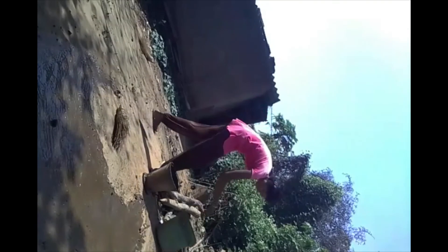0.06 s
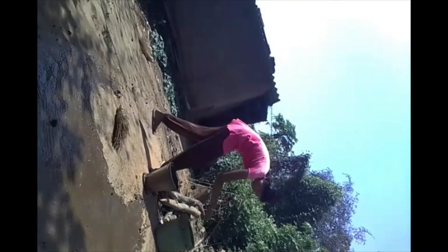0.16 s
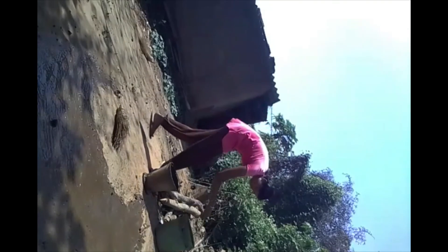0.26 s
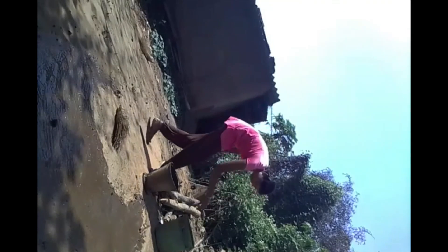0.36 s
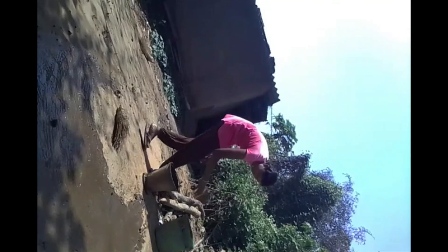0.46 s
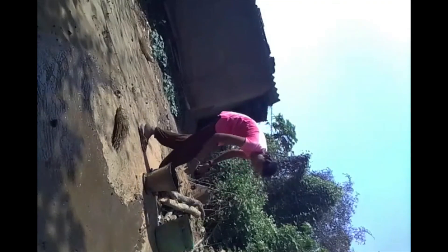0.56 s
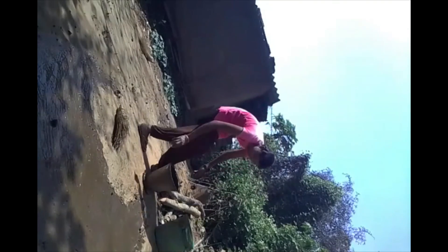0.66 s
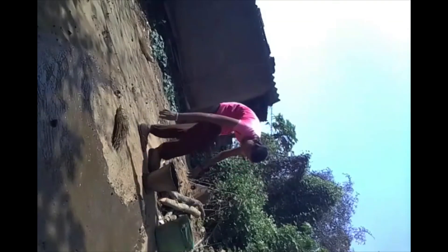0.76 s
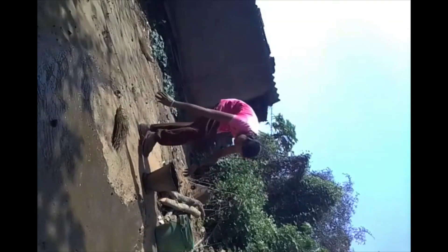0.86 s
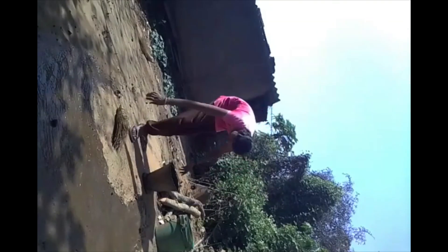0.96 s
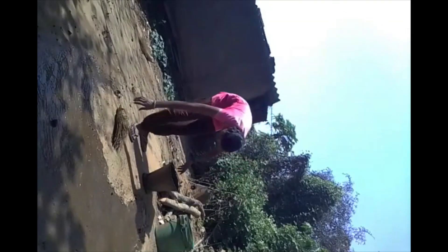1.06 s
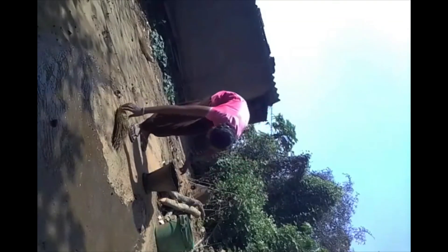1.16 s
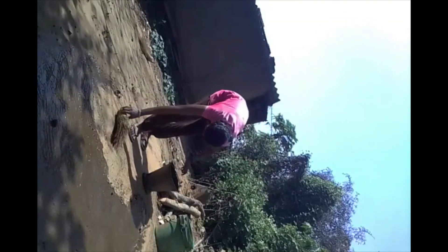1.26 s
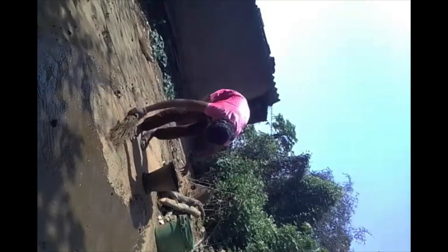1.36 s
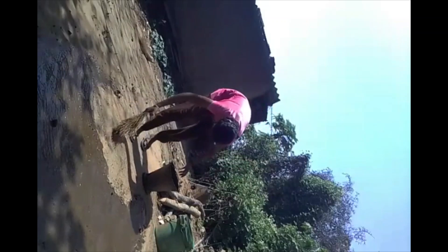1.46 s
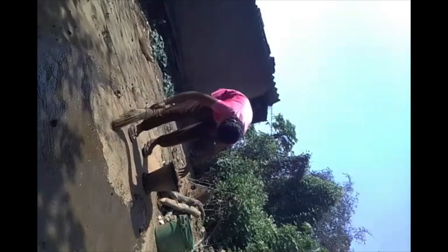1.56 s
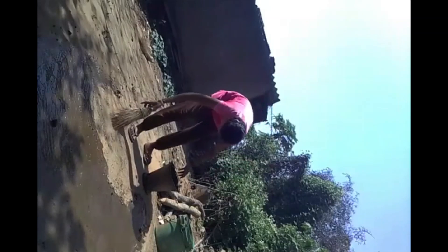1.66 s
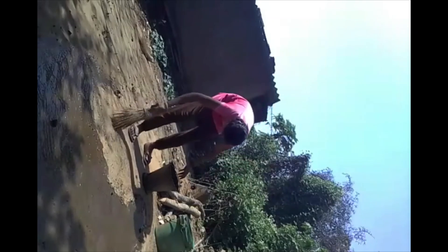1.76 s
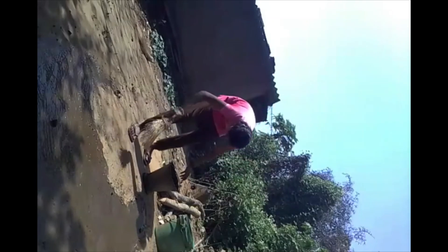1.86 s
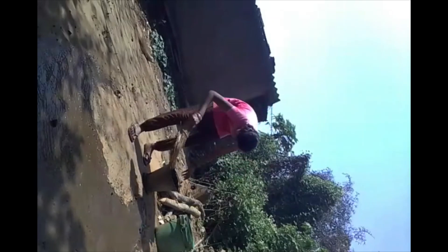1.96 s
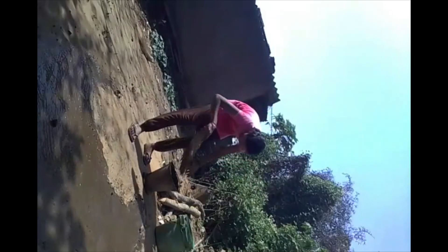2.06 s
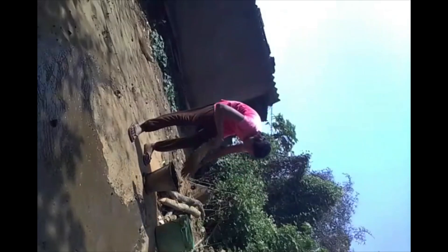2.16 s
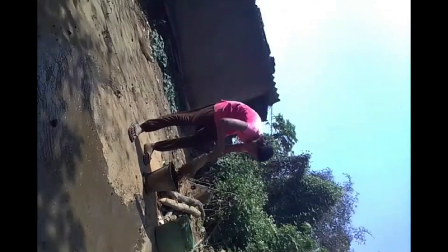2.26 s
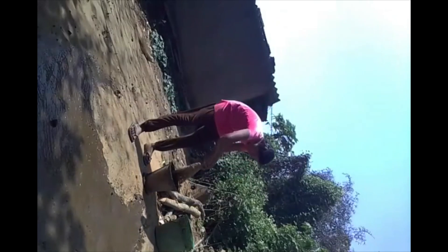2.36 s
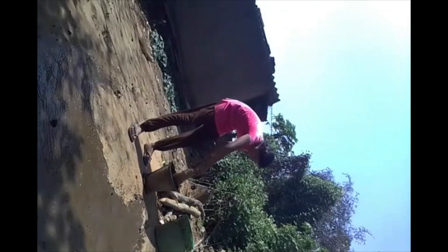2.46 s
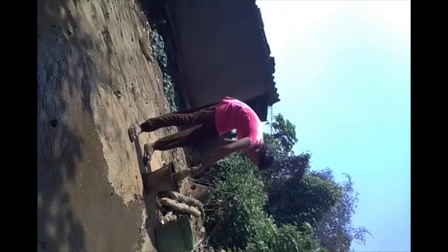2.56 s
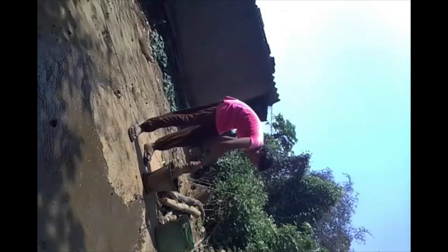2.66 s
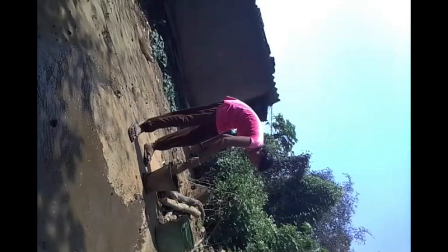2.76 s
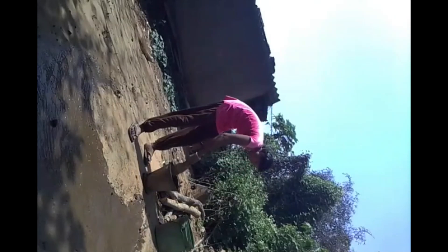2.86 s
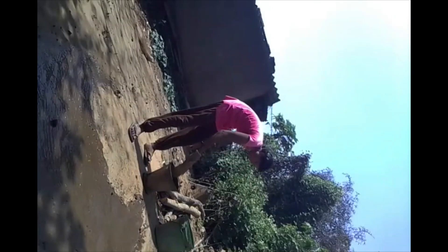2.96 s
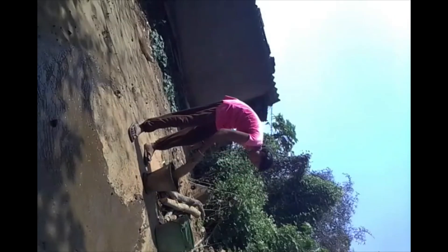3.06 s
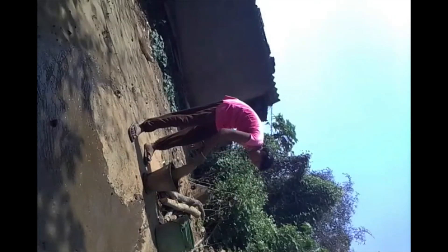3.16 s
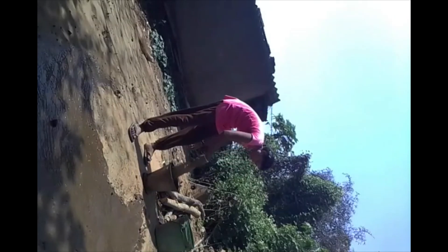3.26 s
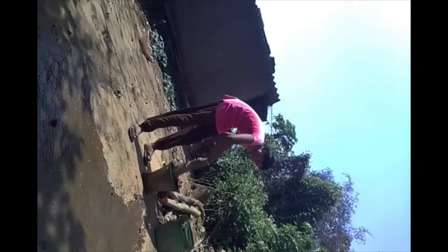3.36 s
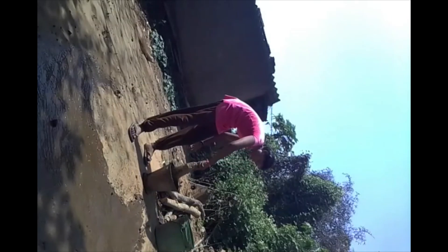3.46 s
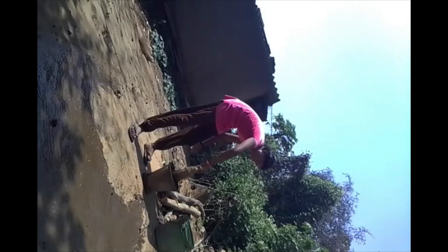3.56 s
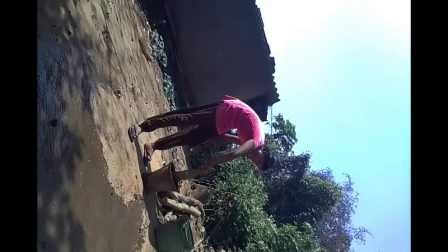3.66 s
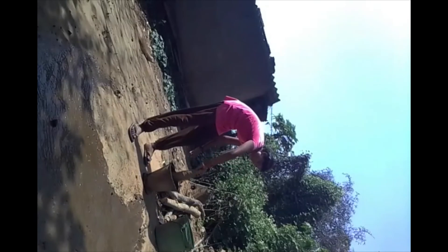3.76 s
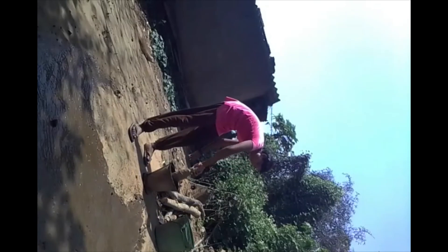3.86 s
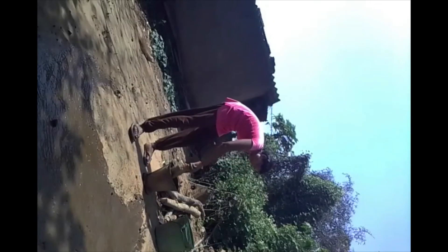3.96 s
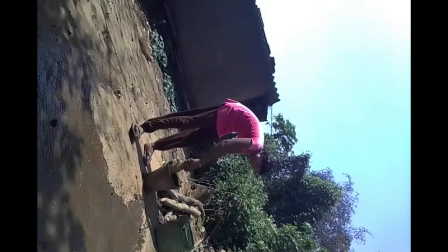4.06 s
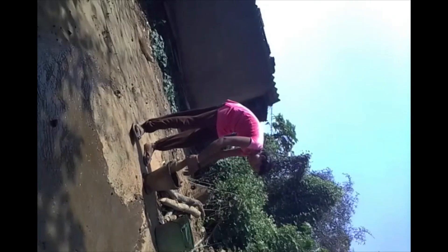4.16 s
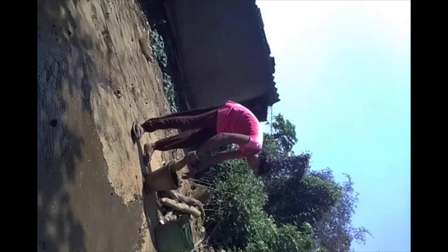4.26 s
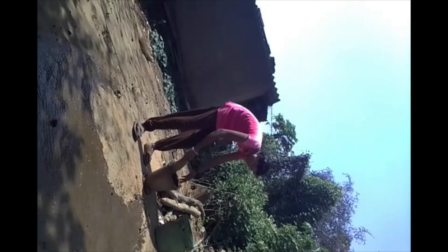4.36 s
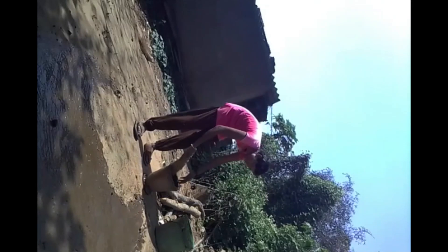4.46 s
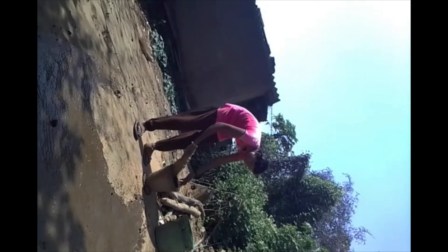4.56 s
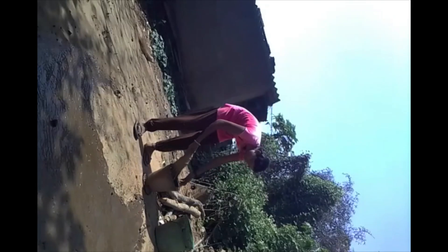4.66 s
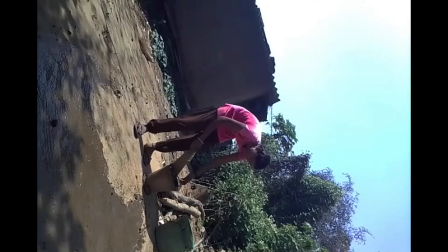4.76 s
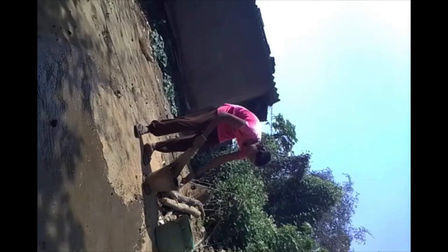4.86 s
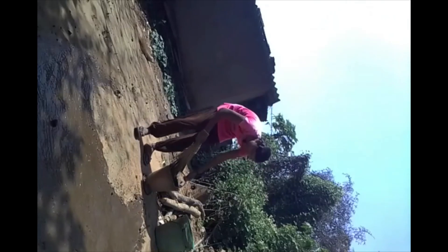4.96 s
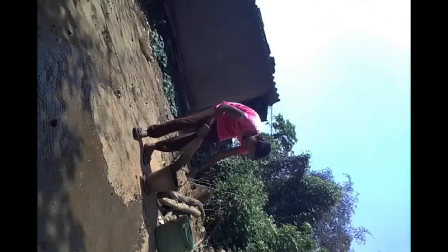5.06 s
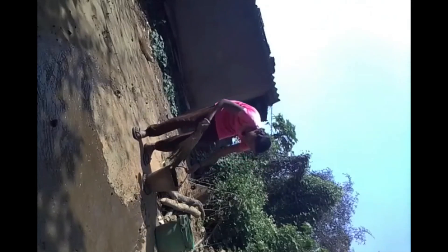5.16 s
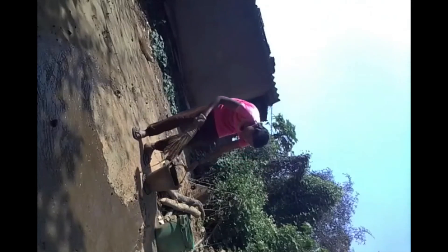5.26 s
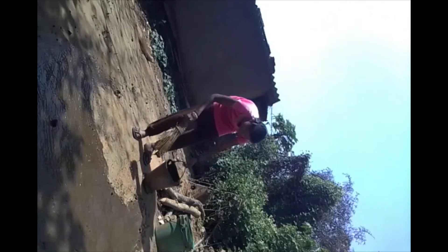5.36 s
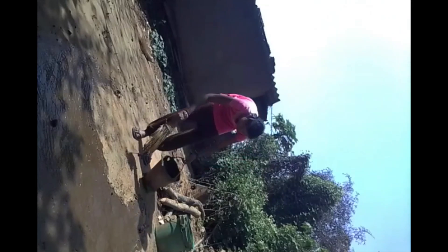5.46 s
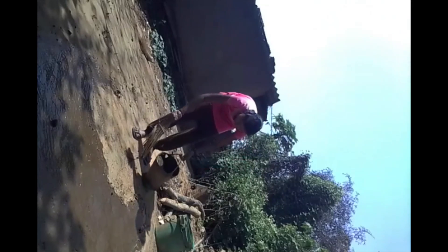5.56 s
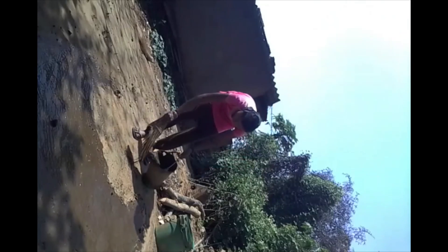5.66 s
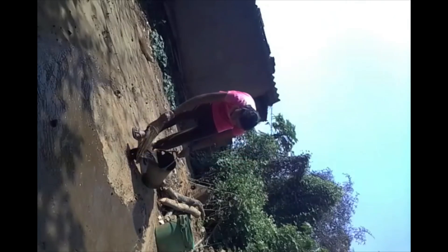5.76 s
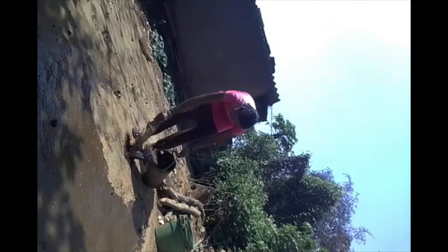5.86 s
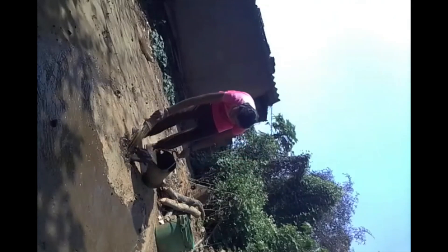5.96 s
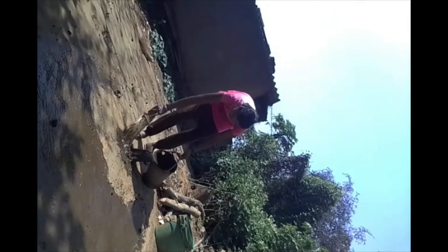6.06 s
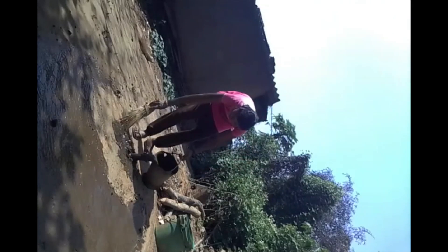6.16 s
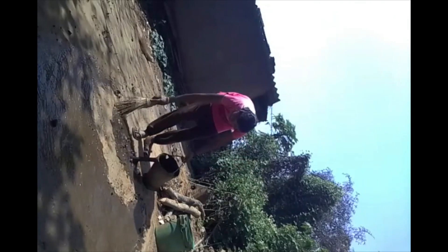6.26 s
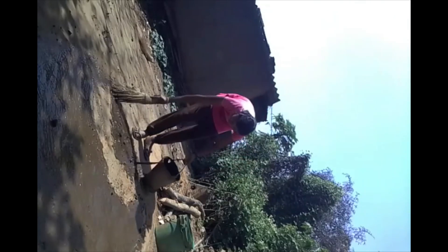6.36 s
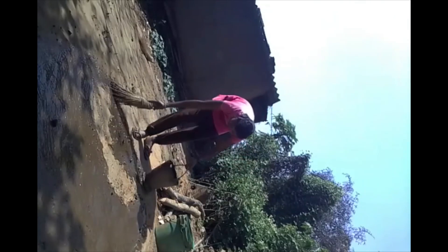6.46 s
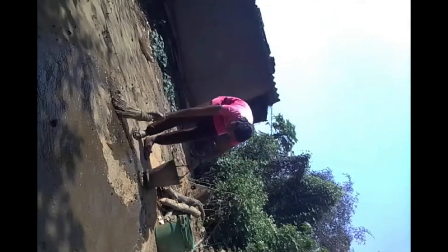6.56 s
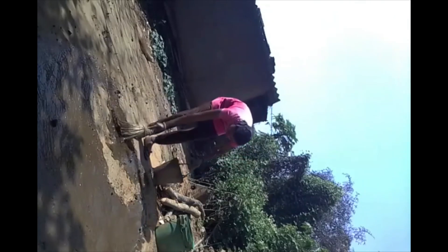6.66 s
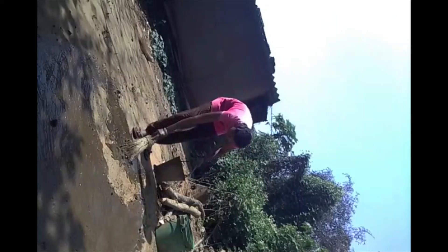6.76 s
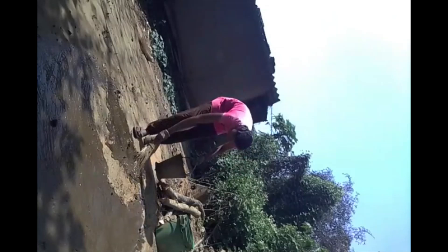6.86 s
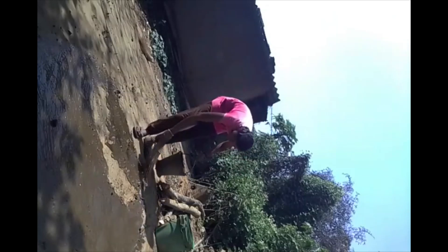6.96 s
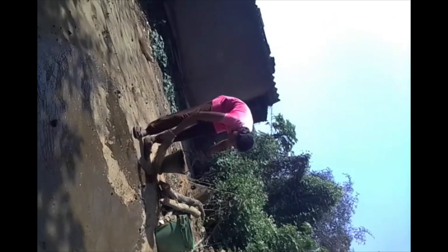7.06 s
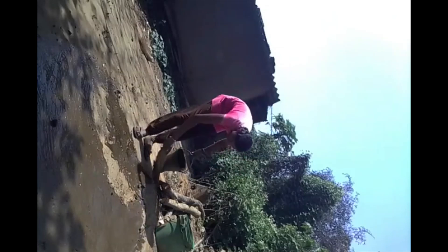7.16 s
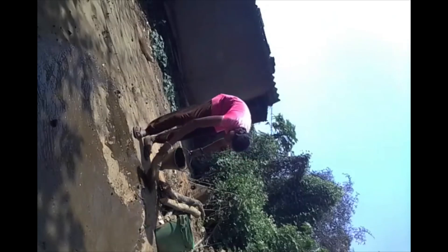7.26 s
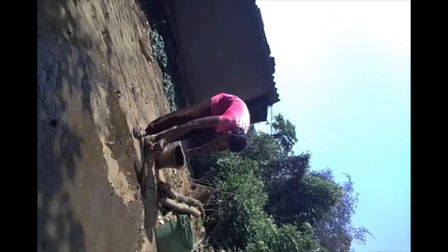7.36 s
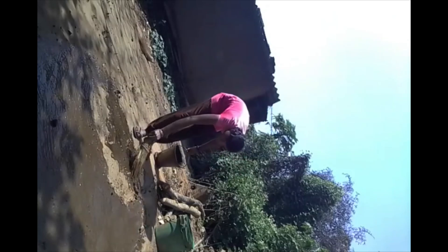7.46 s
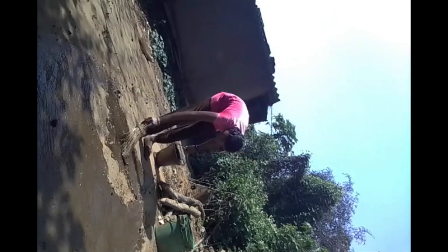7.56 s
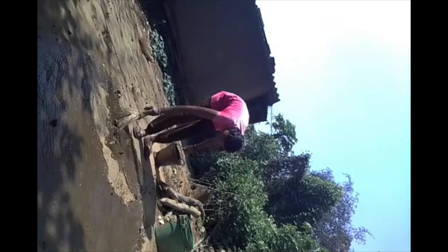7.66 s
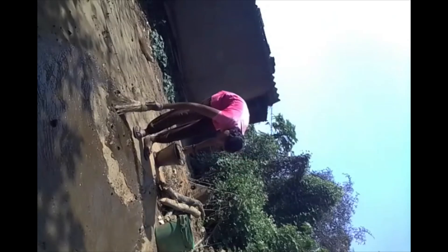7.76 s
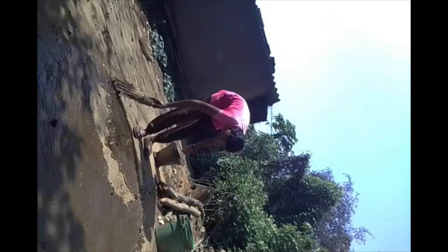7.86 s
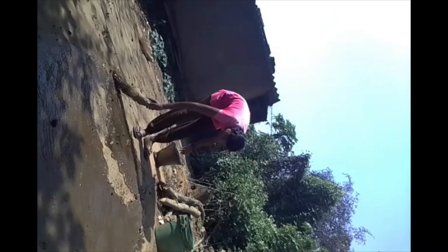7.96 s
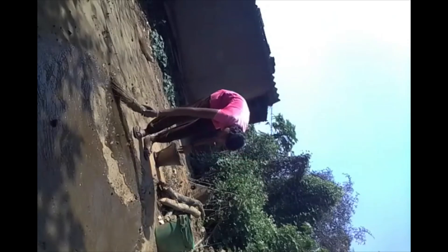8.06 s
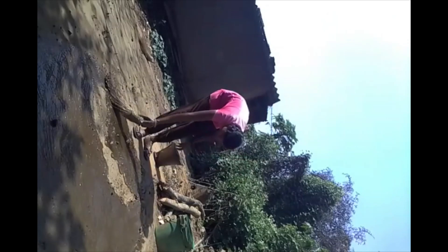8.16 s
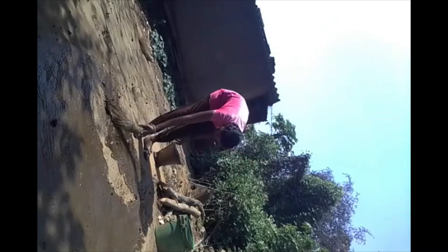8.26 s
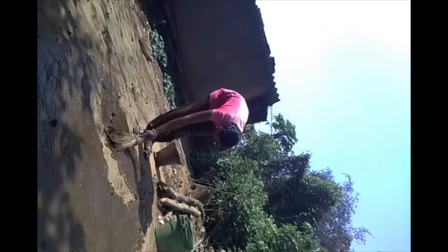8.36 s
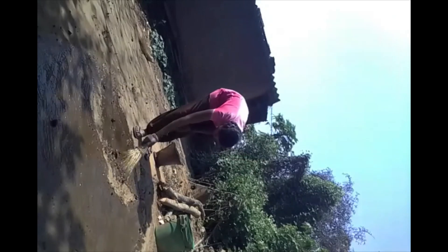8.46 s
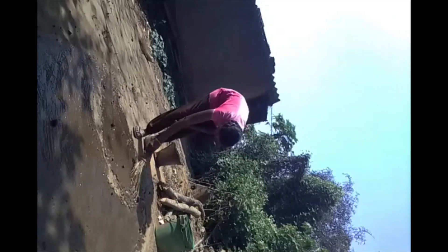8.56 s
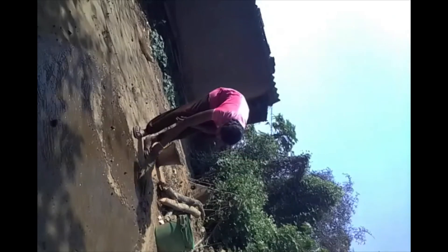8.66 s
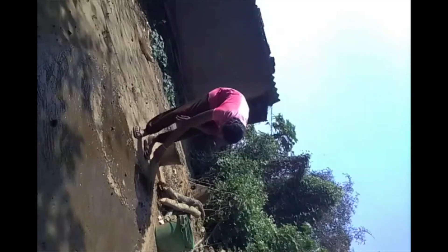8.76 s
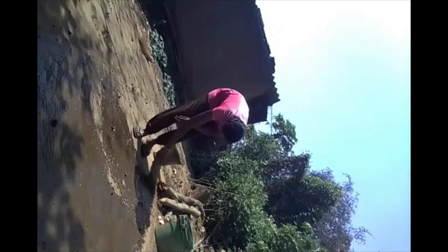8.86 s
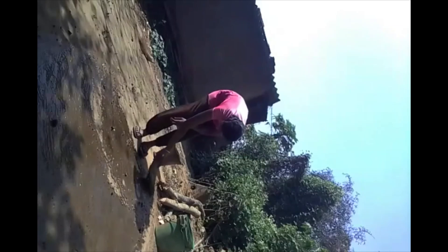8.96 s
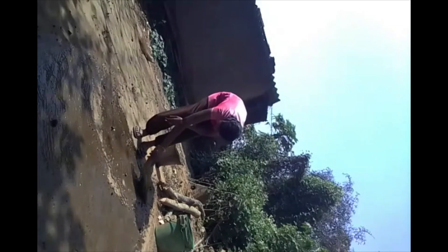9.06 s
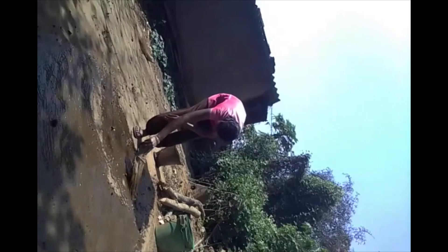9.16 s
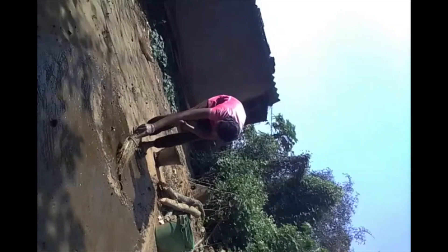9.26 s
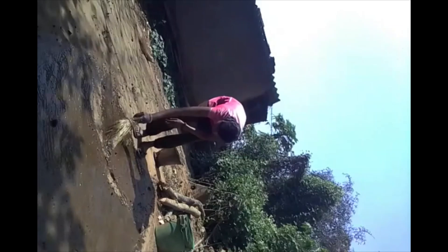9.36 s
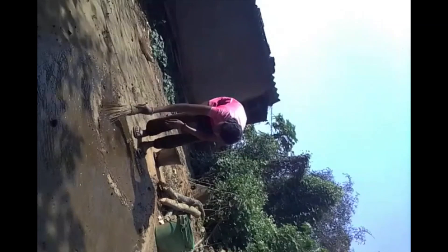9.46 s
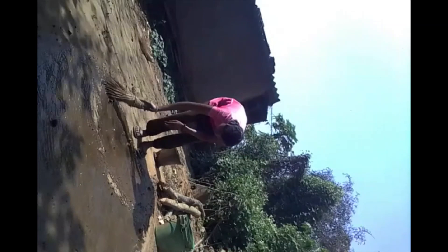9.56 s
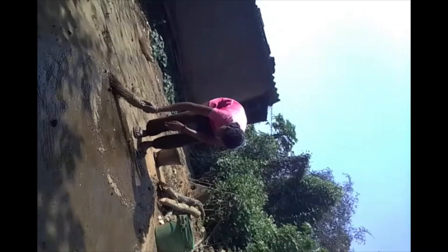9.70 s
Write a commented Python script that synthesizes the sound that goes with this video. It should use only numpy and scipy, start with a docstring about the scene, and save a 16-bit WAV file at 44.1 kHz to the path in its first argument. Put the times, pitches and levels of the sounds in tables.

```python
"""A village courtyard with a wet mud floor. Someone steps across it, handles a short straw broom, then
sweeps in uneven strokes: stalk tips crackle, the pressed bundle scrapes, mud slaps, the broom knocks.
A hen clucks; further off, chicks peep and a rooster gives one hoarse crow. House walls answer faintly
and a distant motor hums under the open air. The small microphone rings in the high treble."""
import sys
import numpy as np
from scipy import signal
from scipy.fft import rfft, irfft
from scipy.io import wavfile

SR = 44100
rng = np.random.default_rng(int(sys.argv[2]) if len(sys.argv) > 2 else 0)


def master_out(mix):
    """Clip the mix to full scale and print it as 16-bit PCM to the path in sys.argv[1]."""
    frames = np.transpose(np.atleast_2d(mix))
    ceiling = np.clip(frames, -1, 1)
    pcm = np.round(ceiling * 32767).astype(np.int16)
    wavfile.write(sys.argv[1], SR, pcm)


N = 429093
TIME = np.arange(N) / SR

# broom strokes over the floor: start_s, rise_s, length_s, force_db, bite_db, scrape_vs_hiss_db
STROKES = [(5.902, 0.1, 0.56, -46.5, 4, -1.5), (6.144, .16, 0.32, -41.5, 4.5, -6),
           (6.579, 0.19, 0.47, -32, 5.5, -10), (7.358, 0.24, 0.5, -33, -1.5, -7),
           (8.012, 0.37, 0.72, -35, 6, -8), (8.659, 0.12, 0.27, -39, 7, -7.5),
           (9.012, 0.22, 0.605, -32, 1.5, -8)]
# bright EQ of the stalk tips: freq_hz, gain_db
STALKS = [(100, -58), (1000, -23), (3000, -8), (6000, -2), (8500, 2), (11500, 7), (14000, 1)]
# midrange EQ of the pressed bundle: freq_hz, gain_db
SCRAPE = [(70, -45), (300, -32), (600, -11), (1000, -4.5), (1500, -1.5), (3200, 2.5), (4500, 1), (6500, -2),
          (9000, -13), (14000, -30)]


def sweeping(hiss_db=-2.0, scrape_db=-0.28, wet_db=-2, drying_db_per_s=7):
    """Dragged tips merge into a swish; pressure adds scrape, and a squelch while the broom is soaked."""
    hiss, scrape = stroke_envelopes()
    tips, bundle = bristles(rate=16000, spread_db=0.5, snag_rate=193, snag_db=-12.0, patchy_db=1.5)
    squelch = band(grains(rate=2500, spread_db=3.6), hz=1500, width_hz=1100)
    wetness = undb(wet_db - drying_db_per_s * np.abs(TIME - STROKES[0][0]))
    body = undb(scrape_db) * colour(bundle, SCRAPE) + wetness * squelch
    return flexing(undb(hiss_db) * hiss * colour(tips, STALKS) + scrape * body)


def stroke_envelopes(trail_hiss_db=-62, trail_scrape_db=-66, bite_share=0.35, ease_db_per_s=7):
    """Each stroke bites as the stalks bend, then drags and eases; between strokes the tips trail."""
    # the hand leans in mid-stroke and the bundle grinds: centre_s, half_width_s, scrape_db
    pushes = [(6.775, 0.035, -39.5), (6.94, 0.051, -36.5), (7.06, 0.026, -42), (7.605, 0.0048, -33),
              (8.345, 0.022, -39.5), (9.245, 0.016, -38.5)]
    started = TIME > STROKES[0][0]
    hiss, scrape = started * undb(trail_hiss_db), started * undb(trail_scrape_db)
    for start, rise, length, db, bite_db, rub_db in STROKES:
        press = pressure(start, rise, length, release_s=0.02)
        dragged_s = TIME - start - rise
        bite = np.exp(-(dragged_s / (bite_share * rise)) ** 2)
        force = undb(db + bite_db * bite - ease_db_per_s * np.clip(dragged_s, 0, length))
        hiss = np.hypot(hiss, force * press ** 0.5)
        scrape = np.hypot(scrape, force * undb(rub_db) * press ** 0.66)  # needs more pressure than hiss
    for s, width, db in pushes:
        scrape = np.hypot(scrape, undb(db) * np.exp(-((TIME - s) / width) ** 2 / 2))
    return hiss, scrape


def handling(hiss_db=-1.0, scrape_db=-4, sag_db_per_s=6):
    """The loose bundle rustles in the hand: a brush of fine clicks and a gritty stalk-on-stalk rub."""
    # the broom lifted, turned and wetted: start_s, rise_s, length_s, force_db, scrape_vs_hiss_db
    rustles = [(0.396, 0.22, 0.22, -45.5, -11), (1.075, 0.013, 0.015, -40, 1.5),
               (1.156, 0.045, 0.42, -49, -9), (1.607, 0.13, 0.29, -47.5, -11.5),
               (2.306, 0.022, 0.34, -56, -12), (2.677, 0.029, 0.42, -48.5, -8.5),
               (3.055, 0.016, 0.49, -56, -6), (3.618, 0.062, 0.04, -38, -16),
               (4.035, 0.28, 0.4, -46.5, -3.5), (4.441, 0.051, 0.22, -46.5, -3.5),
               (4.807, 0.017, 0.86, -53, -14), (5.147, .035, 0.074, -52, 1),
               (5.638, 0.033, 0.027, -45.5, -6)]
    hiss, scrape = np.zeros((2, N))
    for start, rise, length, db, rub_db in rustles:
        sag_db = sag_db_per_s * np.clip(TIME - start - rise, 0, length)
        move = pressure(start, rise, length, release_s=0.033) * undb(db - sag_db)
        hiss = np.hypot(hiss, move)
        scrape = np.hypot(scrape, move * undb(rub_db))
    tips, bundle = bristles(rate=10000, spread_db=2.6, snag_rate=80, snag_db=-10.5, patchy_db=2.2)
    grit = band(flexing(bundle), hz=3900, width_hz=5200)
    return undb(hiss_db) * hiss * colour(tips, STALKS) + undb(scrape_db) * scrape * grit


def pressure(start, rise, length, release_s):
    """One move of the hand: pressure builds smoothly, holds, then dies as the stalks straighten."""
    t = TIME - start
    attack = np.sin(np.pi / 2 * np.clip(t / rise, 0, 1)) ** 2
    return attack * np.exp(-np.maximum(t - length, 0) / release_s)


def bristles(rate, spread_db, snag_rate, snag_db, patchy_db, snag_s=0.0025):
    """Crackle for tips and bundle: stalks slip one by one, and a snagged tuft lets go in a burst."""
    snags = (rng.random(N) < snag_rate / SR) * rng.random(N) ** 2
    bursts = unit(tails(snags, snag_s))
    contact = unit((1 + undb(snag_db) * bursts) * undb(patchy_db * walk(45)))
    return contact * grains(rate, spread_db), contact * grains(rate, spread_db)


def flexing(x, count=26, q=26, depth=0.43):
    """The free length of the stalks keeps changing, so their resonances flicker and recolour the rasp."""
    for hz in np.geomspace(1300, 8000, count):
        x = x + depth * walk(48) * resonance(x, hz, hz / q)
    return x


def flicks(snap_db=7, tick_db=-8, crack_db=-7, fade_s=0.0021, shake_db=-16, shake_s=0.066,
           slide_db=-9, slide_s=0.00082):
    """A stalk slides, springs free with a single sharp snap and shakes its neighbours."""
    # stalks flicking and spitting: snap_s, level_db, low_crack_offset_db
    releases = [(0.501, -36, -2), (0.637, -36, -2), (1.092, -31, 2), (1.5163, -27.5, -36),
                (1.998, -40, -32), (2.358, -36.5, -28), (2.416, -37.5, -36), (2.4752, -34, -19),
                (2.6277, -28, -36), (2.783, -29.5, -29), (3.5109, -29.5, -36), (3.6368, -26, -34),
                (3.654, -21, -35), (3.7833, -34, -36), (3.9674, -29.5, -29), (4.0782, -24, -10.5),
                (4.15, -27, -36), (4.369, -42, 9), (4.8923, -30.5, -22), (5.106, -37, 0),
                (5.4713, -34, -23), (5.544, -31, -32), (5.831, -29.5, -12), (5.996, -25, -6),
                (6.027, -24, -23), (6.521, -29.5, -6.5), (6.835, -26, 11), (7.9765, -24, -5.5),
                (8.0026, -29.5, 6.5), (8.21, -26, -26), (8.99, -28.5, -38), (9.662, -20.5, -27)]
    snap, tick, crack = np.zeros((3, N))
    lead_s = (SR // 32) / SR
    t = TIME[:SR // 8] - lead_s
    slide = undb(slide_db) * np.exp(-np.abs(t) / slide_s)
    sprung = np.exp(-np.abs(t) / fade_s) + undb(shake_db) * np.exp(-np.abs(t) / shake_s)
    envelope = np.where(t < 0, slide, sprung)
    for s, db, low_db in releases:
        add(snap, s, undb([db + snap_db]))
        add(tick, s - lead_s, envelope * undb(db + tick_db))
        add(crack, s - lead_s, envelope * undb(db + low_db + crack_db))
    # EQ of the lower crack: freq_hz, gain_db
    crack_eq = [(100, -19), (400, 8), (1500, 12), (4200, 21), (7000, 20.5), (14000, -36)]
    bright = colour(snap + tick * rng.standard_normal(N), STALKS)
    return bright + colour(crack * rng.standard_normal(N), crack_eq)


def slaps(attack_s=0.0036, fade_s=0.012, spatter_db=-17, spatter_s=0.058):
    """Each soft blow thuds on the mud; water squirts out and spatters down."""
    # feet, wet lumps and drops landing: start_s, pitch_hz, thud_db, splash_db
    landings = [(0.167, 405, -16, -39.5), (0.206, 359, -35, -53), (0.255, 434, -36, -42.5),
                (0.362, 425, -38, -44.5), (0.44, 532, -38, -49), (0.582, 465, -28, -38.5),
                (0.637, 419, -26.5, -27), (0.653, 358, -27, -61), (3.247, 512, -43, -59),
                (5.983, 2090, -34.5, -53), (6.03, 2160, -35.5, -51), (7.9995, 631, -19.5, -35),
                (8.033, 556, -33, -55)]
    # damped modes of a thud: pitch_ratio, gain_db, t60_s
    thud_modes = [(1, 0, 0.042), (.76, -14.5, 0.095), (2.4, -24, 0.044)]
    # EQ of the splash: freq_hz, gain_db
    splash_eq = [(40, -71), (200, 9.5), (400, 17), (1000, 14), (2000, 2.5), (5000, -1.5), (14000, -2)]
    thuds, squirt = np.zeros((2, N))
    t = TIME[:SR // 4]
    attack = 1 - np.exp(-(t / attack_s) ** 2)
    spray = np.exp(-t / fade_s) + undb(spatter_db) * np.exp(-t / spatter_s)
    for s, hz, thud_db, splash_db in landings:
        ring = sum(undb(db) * np.sin(2 * np.pi * hz * k * t) * decay(t, t60) for k, db, t60 in thud_modes)
        add(thuds, s, 2 * undb(thud_db) * ring * attack)
        add(squirt, s, undb(splash_db) * spray)
    return thuds + colour(squirt * grains(rate=7000, spread_db=1.0), splash_eq)


def knocks(click_db=9):
    """The broom hits something hard: one sharp click and a short, dead ring."""
    # hard contacts: start_s, level_db
    hits = [(1.114, -29.5), (8.0168, -27)]
    # modes of a knock: freq_hz, gain_db, t60_s
    modes = [(664, -1, .025), (1190, -3, 0.01)]
    ring, click = np.zeros((2, N))
    t = TIME[:SR // 8]
    body = sum(undb(db) * np.cos(2 * np.pi * hz * t) * decay(t, t60) for hz, db, t60 in modes)
    for s, db in hits:
        add(ring, s, undb(db) * body)
        add(click, s, undb([db + click_db]))
    return ring + colour(click, SCRAPE)


def shuffles(level_db=-65):
    """Feet shifting on the wet ground make small random pats until the sweeping starts."""
    envelope = tails(np.abs(grains(rate=22, spread_db=2)), fade_s=0.012)
    pats = band(envelope * rng.standard_normal(N), hz=850, width_hz=800)
    return undb(level_db) * pats * (TIME < STROKES[0][0])


def hen(arch=0.035, jitter=0.022, rasp=0.23, swoop_s=0.0111, third_db=-15):
    """Short arching notes; each starts with a rough catch in the throat and settles on its own pitch."""
    out = np.zeros(N)
    waver = 1 + jitter * walk(220)
    flutter = 1 + rasp * walk(300)
    catch = band(rng.standard_normal(N), hz=920, width_hz=450)
    for s, length, hz, db, octave_db, catch_db, glide, swoop in hen_notes():
        u, swell = note(length)
        here = slice(int(s * SR), int(s * SR) + len(u))
        bend = arch * (swell - swell.mean()) + glide * (u - .5) + swoop * np.exp(-u * length / swoop_s)
        phase = turns(hz * (1 + bend) * waver[here])
        overtones = np.sin(2 * phase) + undb(third_db) * np.sin(3 * phase)
        voice = np.sin(phase) + undb(octave_db) * overtones
        onset = undb(catch_db) * (1 - u) ** 2 * catch[here]
        add(out, s, undb(db) * swell * (flutter[here] * voice + onset))
    return out


def hen_notes(cluck_s=0.041, cluck_octave_db=-5.5, cluck_glide=0.041,
              hoot_octave_db=-10.5, hoot_catch_db=-12, hoot_glide=-0.021):
    """Clucks are bright, rough and rising; the purer hoots swoop from above and sink a little."""
    # clucks: start_s, pitch_hz, level_db, catch_db
    clucks = [(2.085, 660, -54.5, -18), (4.098, 675, -50.5, -1), (4.373, 668, -44, 0),
              (4.634, 655, -47, -3), (4.9, 666, -45.5, -12), (5.142, 684, -44, -5), (5.378, 678, -44.5, -5),
              (5.65, 681, -45.5, -8), (5.982, 684, -44.5, -6), (6.314, 733, -41, -2), (6.586, 696, -47, -1),
              (6.848, 706, -43, -16), (7.153, 736, -45, 7)]
    # hoots: start_s, length_s, pitch_hz, level_db, swoop_share_of_pitch
    hoots = [(5.207, 0.056, 676, -43, 0.018), (5.435, 0.041, 678, -44, 0.11),
             (5.736, 0.06, 672, -46.5, 0.38), (6.068, 0.046, 708, -40.5, 0),
             (6.368, 0.038, 691, -41.5, 0.07), (6.405, 0.038, 745, -40.5, 0),
             (6.452, 0.045, 697, -43.5, 0.21), (6.634, 0.088, 702, -42, 0.0045),
             (6.901, 0.082, 691, -38.5, 0.17), (7.215, 0.037, 703, -38.5, 0.018)]
    for s, hz, db, catch_db in clucks:
        yield s, cluck_s, hz, db, cluck_octave_db, catch_db, cluck_glide, 0
    for s, length, hz, db, swoop in hoots:
        yield s, length, hz, db, hoot_octave_db, hoot_catch_db, hoot_glide, swoop


def rooster(throat_hz=660, throat_width_hz=150, throat_db=3, beak_width_hz=260, leak_db=-7.5,
            rasp_db=-5, split_db=-3, throb_from_s=3.455, throb_hz=15.4, throb_db=5.5):
    """A crow through a fixed throat and a moving beak formant: clear note, hoarse swell, throbbing fall."""
    # contour of the crow: time_s, pitch_hz, level_db, beak_hz, hoarseness_0_to_1
    crow = [(2.2, 369.6, -80, 1900, .6), (2.32, 379, -61.5, 1820, 0.65), (2.5, 381, -75, 1700, 0.88),
            (2.53, 392, -49.5, 1560, 0.2), (2.595, 390, -49, 1600, 0.35), (2.635, 384.6, -62, 1720, 0.8),
            (3.0, 386.3, -56, 1840, 0.85), (3.36, 368.4, -65, 1710, 0.69), (3.47, 351, -60.5, 1380, 0.29),
            (3.78, 326, -61, 1312, 0.41), (3.86, 282, -60, 1380, 0.47), (3.96, 270.7, -84, 1360, 0.4)]
    hz, db, beak_hz, hoarse = curves(crow)
    jitter = .025 * walk(200) + .014 * walk(25)
    phase = turns(hz * (1 + hoarse * jitter))
    voice = 0
    for k in np.arange(5, 17) / 3:  # a hoarse voice splits into thirds of its pitch
        share = hoarse * undb(split_db) if k % 1 else 1
        throat = undb(throat_db) / (1 + (2 * (k * hz - throat_hz) / throat_width_hz) ** 2)
        beak = 1 / (1 + (2 * (k * hz - beak_hz) / beak_width_hz) ** 2)
        flutter = np.sqrt(1 - hoarse ** 2) + hoarse * walk(90)
        voice += share * (throat + beak + hoarse * undb(leak_db)) * flutter * np.sin(k * phase)
    rasp = hoarse * undb(rasp_db) * band(rng.standard_normal(N), throat_hz, throat_width_hz)
    throb = throb_db * np.sin(2 * np.pi * throb_hz * np.maximum(TIME - throb_from_s, 0))
    crowing = (TIME > crow[0][0]) & (TIME < crow[-1][0])
    return (voice + rasp) * undb(db + throb) * crowing


def chicks(quaver=0.42):
    """Thin falling whistles with a quick quaver in level."""
    # peeps and other thin bird notes: start_s, length_s, start_hz, end_hz, level_db
    peeps = [(1.16, .07, 4520, 3550, -60), (2.032, 0.032, 4300, 3100, -60.5),
             (2.2, 0.06, 4300, 3660, -59.5), (3.843, 0.072, 4430, 3780, -59),
             (4.99, 0.066, 1545, 1484, -57.5), (6.558, 0.053, 1022, 1013, -51)]
    out = np.zeros(N)
    for s, length, start_hz, end_hz, db in peeps:
        u, swell = note(length)
        add(out, s, undb(db) * swell * np.sin(turns(start_hz + (end_hz - start_hz) * u)))
    return out * (1 + quaver * walk(400))


def motor(drift=0.0062, waver_db=4.0):
    """A motor hums far away; its speed drifts and each harmonic wavers in level."""
    # swell of the hum: time_s, level_db
    swell = [(0, -71.5), (5.2, -70.5), (5.7, -63.5), (8.6, -64.5), (9.3, -58.5)]
    # harmonics of the hum: freq_hz, gain_db
    harmonics = [(78, -13.5), (117, -15), (156, -3.5), (195, -7), (234, -4.5)]
    speed = 1 + drift * walk(4)
    hum = sum(undb(db + waver_db * walk(14)) * np.sin(turns(hz * speed)) for hz, db in harmonics)
    return hum * undb(curves(swell)[0])


def open_air(start_db=-59, rise_db_per_s=0.6962):
    """The murmur of the land: a soft noise bed that slowly grows."""
    # EQ of the outdoor air: freq_hz, gain_db
    air_eq = [(25, -17), (70, -10), (130, -3.5), (260, 7.5), (600, 4.5), (1000, -1.5), (2000, -6),
              (4000, -9), (14000, -9.5)]
    return colour(rng.standard_normal(N), air_eq) * undb(start_db + rise_db_per_s * TIME)


def yard(x, wet_db, t60_s, predelay_s=0.02, dull_hz=2400):
    """Walls and trees add scattered, dulled reflections."""
    t = TIME[:SR]
    echoes = grains(rate=1500, spread_db=3.3)[:SR] * decay(t, t60_s) * (t > predelay_s)
    echoes = signal.lfilter(*signal.butter(1, dull_hz, fs=SR), echoes / np.linalg.norm(echoes))
    return x + undb(wet_db) * signal.fftconvolve(x, echoes)[:N]


def undb(db):
    """Decibels to gain."""
    return 10 ** (np.asarray(db) / 20)


def unit(x):
    """Scale to rms 1."""
    return x / np.sqrt(np.mean(x ** 2) + 1e-20)


def curves(rows):
    """Breakpoint rows to one automation curve per value column."""
    s, *columns = np.transpose(rows)
    return [np.interp(TIME, s, c) for c in columns]


def add(track, s, sound):
    """Mix a sound in at s seconds."""
    i = max(int(s * SR), 0)
    track[i:i + len(sound)] += sound[:N - i]


def walk(rate):
    """Random modulation of rms 1, gliding to rate new values a second."""
    knots = rng.standard_normal(int(N / SR * rate) + 2)
    return unit(np.interp(TIME * rate, np.arange(len(knots)), knots))


def grains(rate, spread_db):
    """Random tiny clicks, about rate a second, a few louder than the rest."""
    hit = rng.random(N) < rate / SR
    size = undb(spread_db * np.minimum(rng.exponential(size=N), 6))
    return unit(hit * size * rng.choice([-1, 1], N))


def colour(x, points, size=4096):
    """Minimum-phase EQ through (freq_hz, gain_db) points that keeps the power of white noise."""
    hz, db = np.transpose(points)
    bins_hz = np.arange(size // 2 + 1) * SR / size
    gain = undb(np.interp(np.log(bins_hz + 1), np.log(hz), db))
    cepstrum = irfft(np.log(gain))
    cepstrum[1:size // 2] *= 2
    cepstrum[size // 2 + 1:] = 0
    response = irfft(np.exp(rfft(cepstrum)))
    return signal.fftconvolve(x, response / np.linalg.norm(response))[:N]


def resonance(x, hz, width_hz):
    """Band-pass with gain 1 at its centre."""
    return signal.lfilter(*signal.iirpeak(hz, hz / width_hz, fs=SR), x)


def band(x, hz, width_hz):
    """Two band-passes in series, scaled to rms 1."""
    return unit(resonance(resonance(x, hz, width_hz), hz, width_hz))


def decay(t, t60_s):
    """Envelope that falls 60 dB in t60_s."""
    return np.exp(-np.log(1000) * t / t60_s)


def tails(clicks, fade_s):
    """Give each click an exponential tail."""
    return signal.lfilter([1], [1, -np.exp(-1 / (fade_s * SR))], clicks)


def note(length):
    """Progress u (0-1) through a call, and its rounded swell."""
    u = np.linspace(0, 1, int(length * SR))
    return u, np.sqrt(4 * u * (1 - u))


def turns(hz):
    """Phase in radians of an oscillator that follows a pitch."""
    return 2 * np.pi * np.cumsum(hz) / SR


def scene():
    """Broom and feet are near; the birds are further off and carry more echo."""
    foreground = handling() + sweeping() + flicks() + slaps() + knocks() + shuffles()
    near = yard(foreground, wet_db=-13.5, t60_s=0.17)
    middle = yard(hen(), wet_db=-12.5, t60_s=0.15)
    far = yard(rooster() + chicks(), wet_db=-1.5, t60_s=0.27)
    return (near + middle + far + open_air() + motor())[None]


def record(dry, port_hz=11350, port_width_hz=1500, ring_db=6, top_hz=13900):
    """The microphone port rings in the high treble; the top is cut steeply."""
    sound = dry + undb(ring_db) * resonance(dry, port_hz, port_width_hz)
    return signal.sosfilt(signal.ellip(12, .2, 80, top_hz, fs=SR, output="sos"), sound)


dry = scene()
out = record(dry)
master_out(out)
```